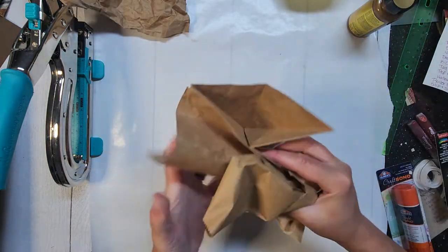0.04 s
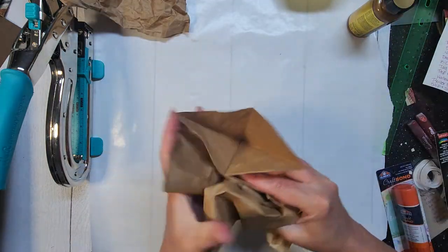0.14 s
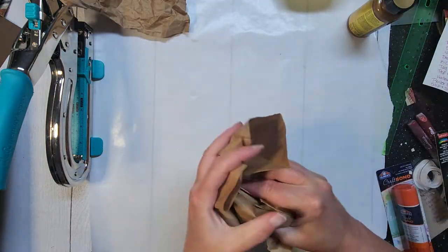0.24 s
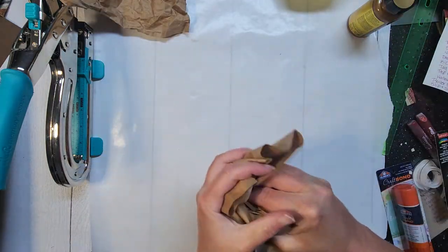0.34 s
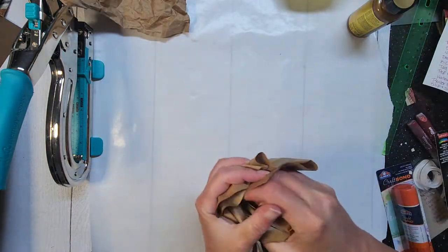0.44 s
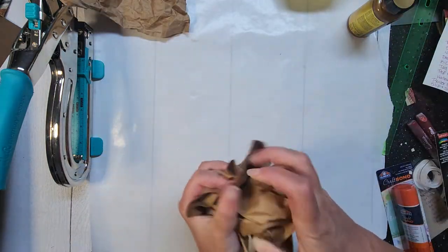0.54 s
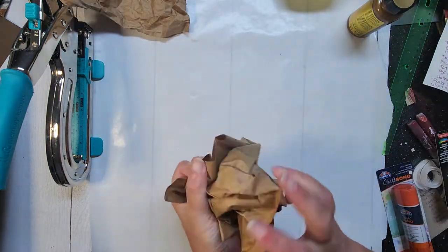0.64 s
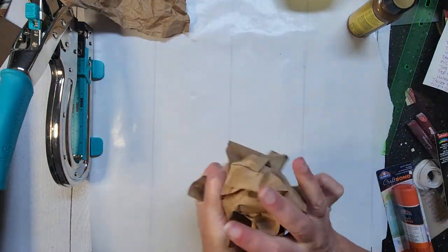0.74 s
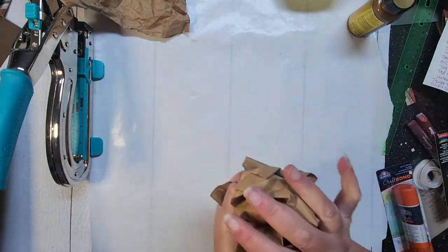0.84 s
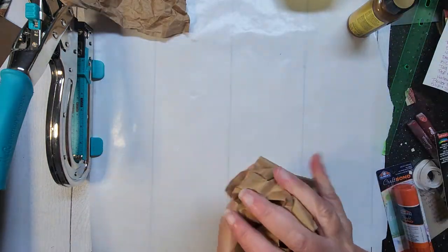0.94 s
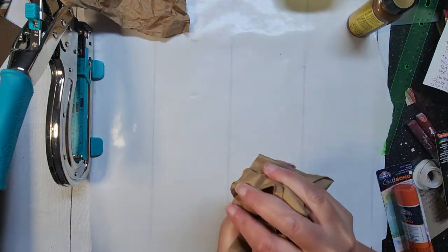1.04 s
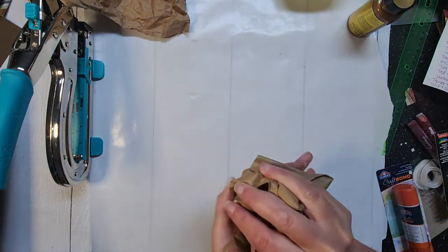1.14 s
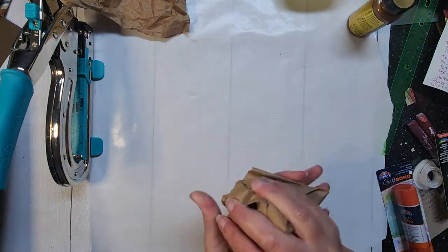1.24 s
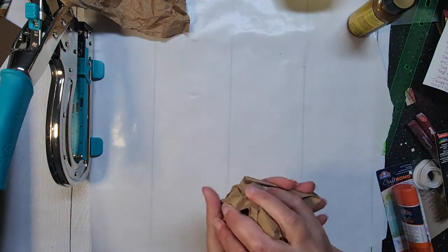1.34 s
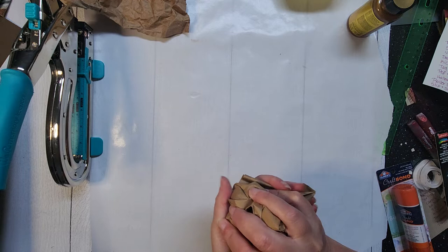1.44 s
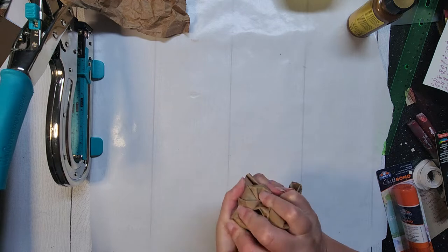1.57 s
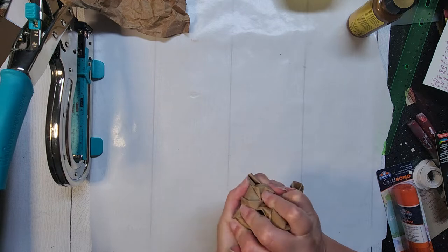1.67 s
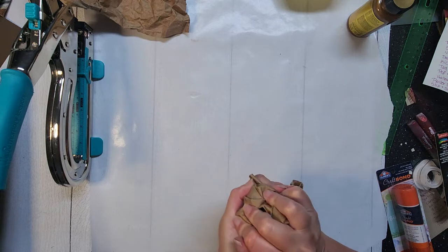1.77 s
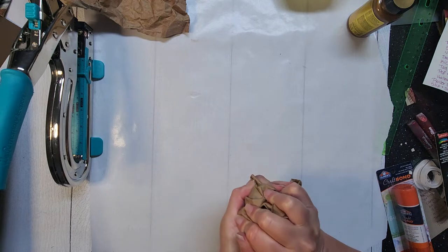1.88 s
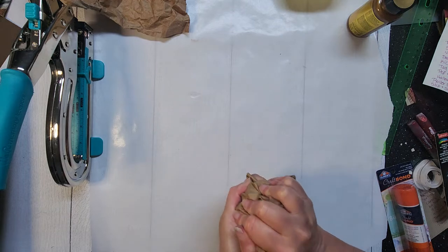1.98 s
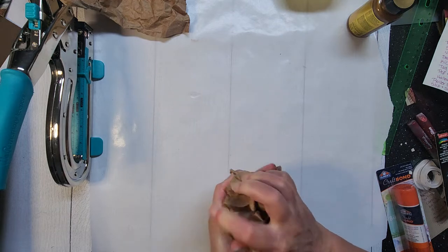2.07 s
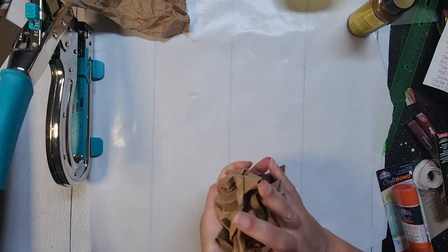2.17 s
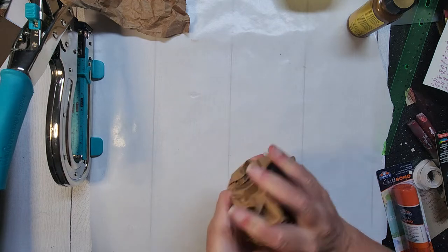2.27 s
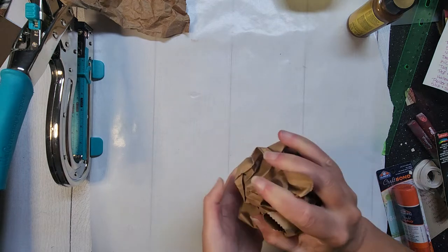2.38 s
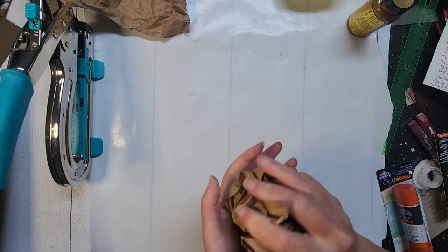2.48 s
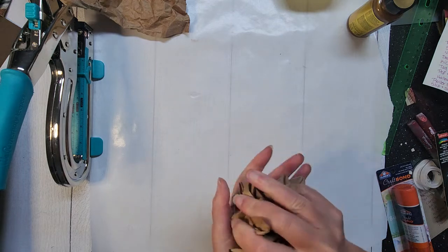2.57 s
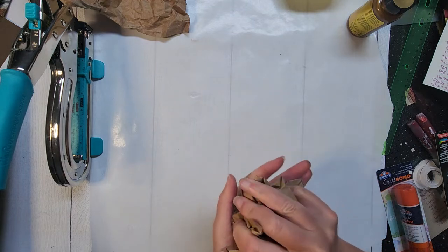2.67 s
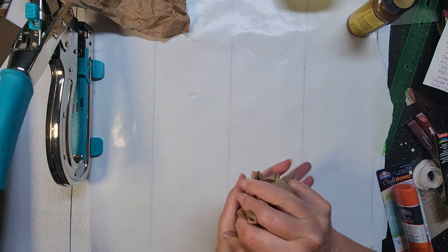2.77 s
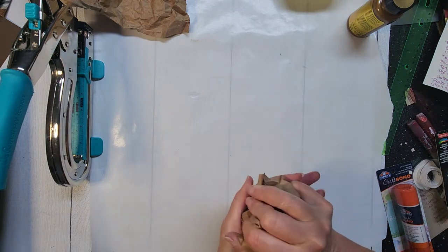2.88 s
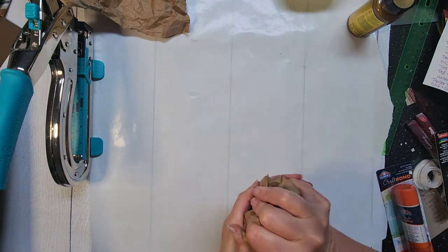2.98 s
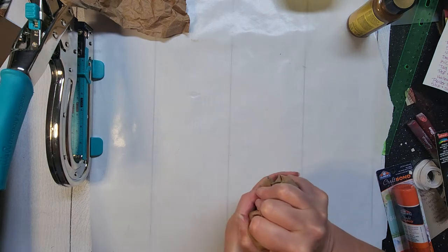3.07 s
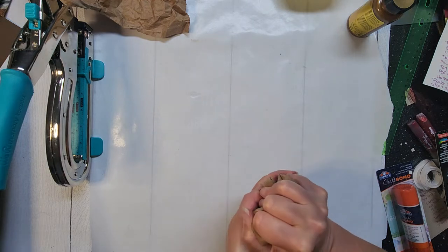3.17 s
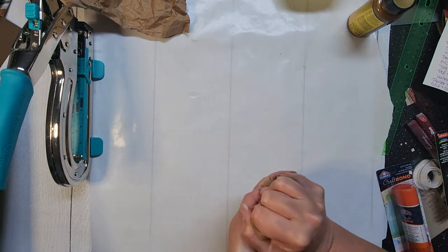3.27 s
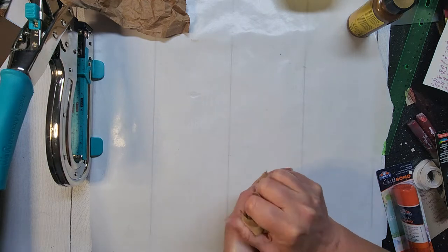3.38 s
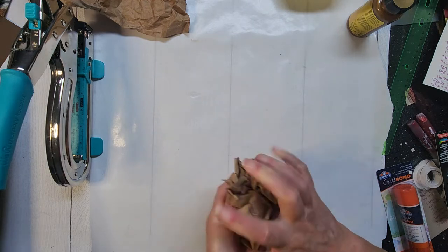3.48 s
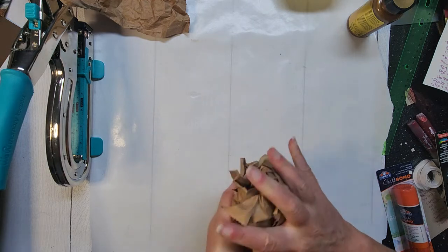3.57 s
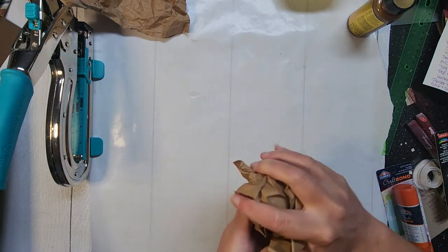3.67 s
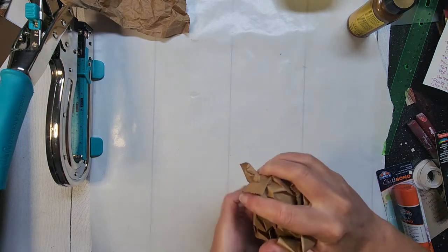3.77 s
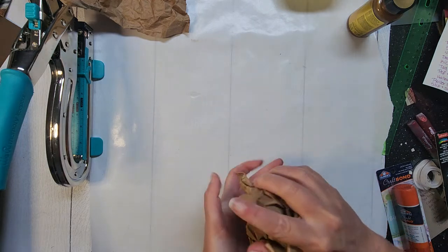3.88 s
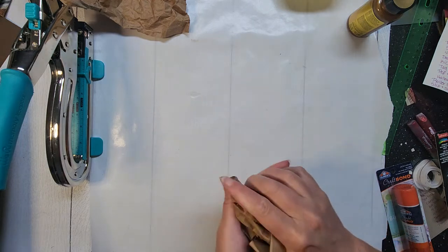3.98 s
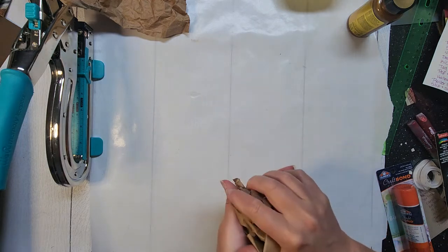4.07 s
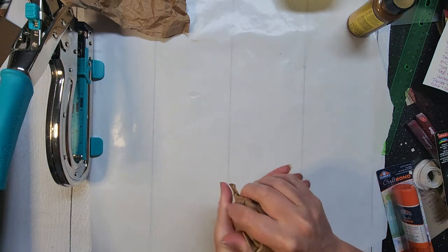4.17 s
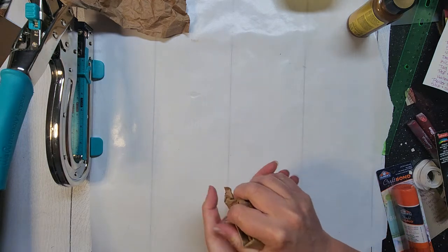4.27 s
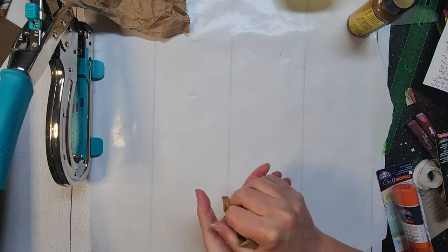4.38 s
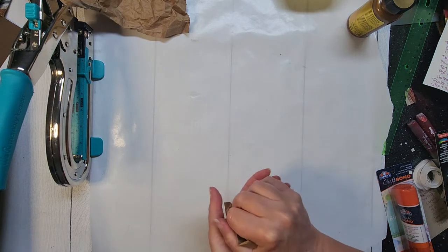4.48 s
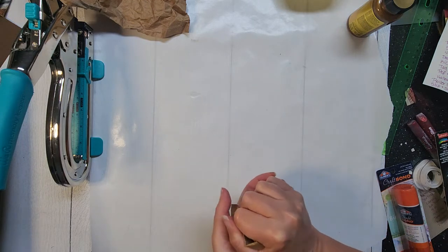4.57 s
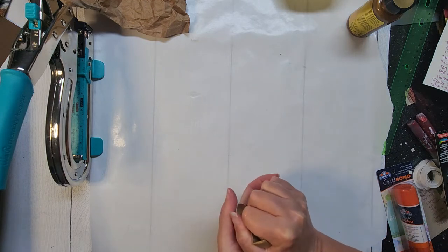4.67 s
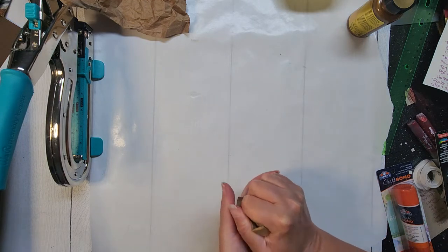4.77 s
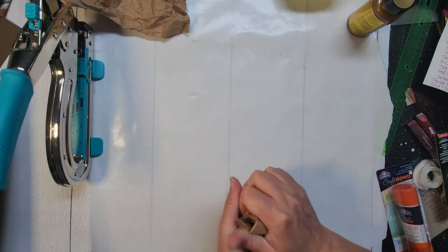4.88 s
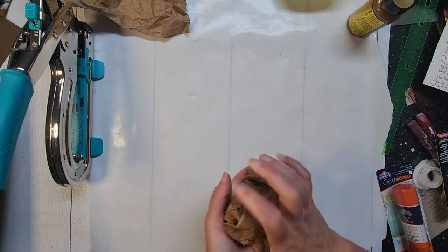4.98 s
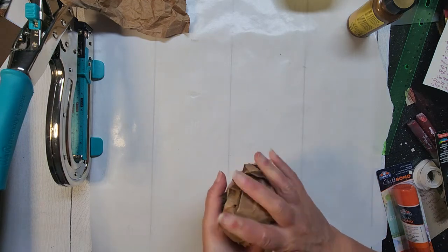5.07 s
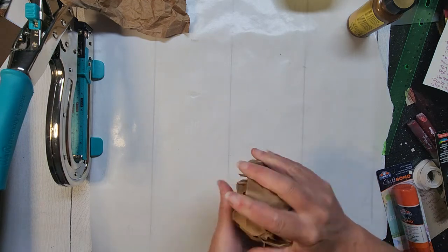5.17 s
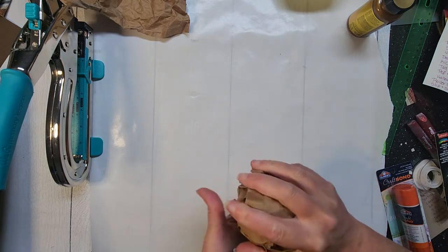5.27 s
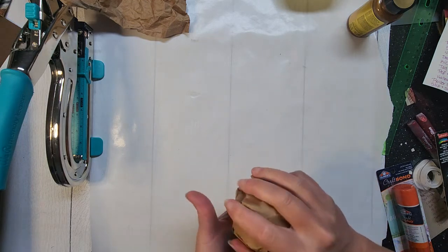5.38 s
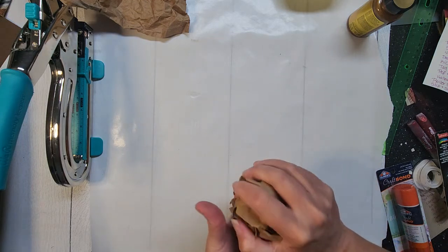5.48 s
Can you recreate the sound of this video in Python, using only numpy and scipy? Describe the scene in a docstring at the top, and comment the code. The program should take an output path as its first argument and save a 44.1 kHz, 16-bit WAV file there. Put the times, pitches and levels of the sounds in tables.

```python
"""A brown paper bag is crushed into a ball by two hands just above a table, close to the microphone, in a small room.
Each crease is a kick and a shiver of noise: a bright crack and the ring of a stiff facet, with small crinkles around.
Paper slides on paper and skin as a hiss of dense clicks; the open bag flaps and booms in low noise bands at first.
The wad thumps as it folds in: a noise knock over a soft low sine. Three times the squeeze rests for a new grip.
Hollows round the wad, echoes of table and walls and a quiet room tone place it before two microphone ports."""
import sys
import numpy as np
from scipy import signal
from scipy.fft import rfft, irfft, next_fast_len
from scipy.io import wavfile
from scipy.ndimage import uniform_filter1d

SR = 44100
rng = np.random.default_rng(int(sys.argv[2]) if len(sys.argv) > 2 else 0)


def output_pcm(signal):
    """Save a mono or channel-first signal as 16-bit PCM at the path in sys.argv[1].

    Samples are clipped to [-1, 1] before scaling.
    """
    pcm = np.clip(np.atleast_2d(signal).T, -1, 1) * 32767
    wavfile.write(sys.argv[1], SR, np.round(pcm).astype(np.int16))


N = 243873


def from_db(db):
    """Amplitude factor of a level in dB."""
    return 10 ** (np.asarray(db) / 20)


def rms_one(x):
    """Scale to an rms of 1."""
    return x / np.sqrt(np.mean(x ** 2) + 1e-20)


def in_time(rows):
    """Each column of a curve at every sample; the first column is t/s."""
    s, *columns = np.transpose(rows)
    return [np.interp(np.arange(N) / SR, s, c) for c in columns]


def filtered(x, hz, kind, order=2):
    """Butterworth filter."""
    return signal.lfilter(*signal.butter(order, np.clip(hz, 20, .47 * SR), kind, fs=SR), x)


def coloured(x, spectrum):
    """Causal (minimum-phase) filter that follows a spectrum; rms 1."""
    size = next_fast_len(N // 2 + 4096) * 2
    hz, db = np.transpose(spectrum)
    bins_hz = np.arange(size // 2 + 1) * SR / size
    gain_db = np.interp(np.log(bins_hz + 1), np.log(hz), db)
    # keeping only the first half of the cepstrum makes the filter causal
    cepstrum = irfft(np.log(from_db(gain_db)))[:size // 2]
    response = np.exp(2 * rfft(cepstrum, size))
    return rms_one(irfft(rfft(x, size) * response)[:, :N])


def add(out, s, sound):
    """Mix a short stereo sound in at time s."""
    at = int(np.clip(round(s * SR), 0, N - 1))
    out[:, at:at + sound.shape[1]] += sound[:, :N - at]


def spread(clicks, lag_s):
    """Give every click its own spot, so it reaches the two microphone ports at slightly different times."""
    at = np.arange(len(clicks))
    lag = np.round(rng.normal(0, lag_s * SR, len(at))).astype(int)
    late = np.clip(at + lag, 0, at[-1])
    return np.array([clicks, np.bincount(late, clicks, len(at))])


# quiet small room: (f/Hz, relative level/dB per Hz)
QUIET_ROOM = [(20, -29.5), (45, -7.5), (78, -3.5), (100, -14), (135, -1), (180, -17.5), (300, -12.5),
              (800, -24.5), (1700, -35.5), (8000, -47), (16000, -54.5)]


def room_tone(level_db=-68.5):
    """The steady tone of the room: noise in a fixed colour, widely spread between the ports."""
    return from_db(level_db) * coloured(spread(rng.standard_normal(N), 0.0012), QUIET_ROOM)


# the hands close on the wad, hold it, ease off and let go; the last hold lasts to the end:
# (closed t/s, easing from t/s, letting go t/s, rustle level/dB)
HAND_GRIPS = [(0.0, 1.623, 1.895, -43), (2.062, 2.76, 3.24, -43), (3.43, 4.424, 4.659, -42),
              (5.09, 6.3, 5.56, -41.5)]
CLOSE_DB_PER_S, EASE_DB, LET_GO_DB_PER_S = 382, 16.5, 328
# colour of a held grip against its rustle; it brightens as the pressure eases
GRIP_BODY_DB, GRIP_EDGE_DB, EASED_BRIGHTER_DB = -8.5, 0.5, 5
# folds sliding over each other under a push of the fingers: (peak t/s, rise t/s, fall t/s,
# rustle level/dB, hollow body relative level/dB, bright edge relative level/dB)
FOLD_SLIDES = [(0.0, .02, 0.021, -20.5, -9, -0.5), (0.05, 0.047, 0.065, -24, -8.5, 0),
               (0.188, 0.044, 0.053, -20.5, -10, 0), (0.375, 0.17, 0.074, -36.5, 2, -2),
               (0.477, .055, 0.021, -25.5, -9.5, 0), (0.57, 0.051, 0.12, -23.5, -5, 2),
               (0.738, 0.045, 0.015, -27.5, -5, 1.5), (0.827, 0.072, 0.042, -26.5, -6, -4),
               (0.987, 0.076, 0.045, -30, -5.5, -2), (1.051, 0.025, 0.052, -26, -5, -2),
               (1.155, 0.047, 0.029, -28, -8.5, -1), (1.285, 0.058, 0.032, -31.5, -6.5, 1),
               (1.517, 0.14, 0.098, -33.5, -8, -2), (1.78, 0.073, 0.047, -53, -0.5, 9.5),
               (2.133, 0.07, .08, -31, -9, 1.5), (2.325, 0.094, 0.23, -35.5, -5.5, -0.5),
               (2.466, 0.045, 0.16, -32.5, -4, 3), (2.57, 0.028, 0.12, -34, -1, -14),
               (2.815, 0.14, 0.043, -34, -10.5, -6), (2.982, 0.13, 0.037, -35.5, -10, -7),
               (3.085, 0.083, 0.052, -37, -9.5, -15), (3.166, .008, 0.031, -53, 1.5, 3),
               (3.36, 0.14, .06, -64, -19, -3), (3.488, 0.089, .024, -32.5, -10, 3.5),
               (3.58, 0.041, 0.026, -28, -6.5, 3), (3.67, 0.066, .09, -38.5, -6, 3),
               (3.802, 0.046, 0.017, -27.5, -8, 2), (3.881, 0.087, 0.022, -33, -9.5, -1),
               (3.967, 0.022, 0.067, -29, -11, -5.5), (4.178, 0.05, 0.078, -27, -17, 1),
               (4.416, 0.033, 0.028, -37.5, 6.5, -17), (4.86, 0.061, .05, -54.5, -14, 5.5),
               (4.941, 0.06, 0.073, -35.5, -12.5, 3.5), (5.001, 0.049, 0.014, -35.5, -6.5, 2.5),
               (5.086, 0.028, 0.023, -32, -14, 1), (5.32, 0.014, 0.048, -45, -16, 1)]
# a slide swells and dies by this much within its rise and its fall; beyond them it drops more steeply
SLIDE_SWING_DB, SLIDE_CURVE = 14.5, 1.54


def squeeze():
    """Level of the rustle, and of its hollow body and bright edge against it (dB): steady grips with slides on top."""
    t = np.arange(0, N, 32) / SR
    parts = []
    for closed_s, ease_s, let_go_s, db in HAND_GRIPS:
        eased = np.interp(t, [ease_s, let_go_s], [0, 1])
        closing_db = CLOSE_DB_PER_S * np.maximum(closed_s - t, 0)
        letting_go_db = LET_GO_DB_PER_S * np.maximum(t - let_go_s, 0)
        level_db = db - closing_db - EASE_DB * eased - letting_go_db
        brighter_db = EASED_BRIGHTER_DB * eased
        parts.append([level_db, level_db + GRIP_BODY_DB - brighter_db, level_db + GRIP_EDGE_DB + brighter_db])
    for s, rise_s, fall_s, db, body_db, edge_db in FOLD_SLIDES:
        from_peak = np.maximum((s - t) / rise_s, (t - s) / fall_s)
        level_db = db - SLIDE_SWING_DB * from_peak ** SLIDE_CURVE
        parts.append([level_db, level_db + body_db, level_db + edge_db])
    # grips and slides add in power
    level, body, edge = 10 * np.log10(np.sum(from_db(parts) ** 2, axis=0) + 1e-20)
    return in_time(np.transpose([t, level, body - level, edge - level]))


# paper sliding on paper, close to the microphone: (f/Hz, relative level/dB per Hz)
PAPER_HISS = [(40, -30.5), (140, -27), (250, -15), (460, -6), (630, -9.5), (850, -4.5), (1100, -3),
              (1600, 0), (2600, 0.5), (5000, -1.5), (7500, -10), (10500, -13.5), (15500, -18)]


def rustle(rustle_db, body_db, edge_db, catches_per_s=6000, scatter_db=4, judder_db=3.0,
           body_gain_db=-2.5, mid_gain_db=-1, edge_gain_db=-1):
    """Fibres catch and slip thousands of times a second, in uneven spurts."""
    judder = rms_one(uniform_filter1d(rng.standard_normal(N), size=130))
    catches = (rng.random(N) < catches_per_s / SR) * rng.choice([-1, 1], N)
    sizes = from_db(scatter_db * np.clip(rng.standard_normal(N), -2, 2) + judder_db * judder)
    hiss = coloured(spread(catches * sizes, 8.5e-5), PAPER_HISS)
    # closed hands bring out the hollow body, sliding over open paper the bright edge
    body = rms_one(filtered(hiss, 1052, "low", order=3))
    middle = rms_one(filtered(hiss, [1200, 5000], "band", order=3))
    edge = rms_one(filtered(hiss, 6470, "high", order=3))
    return (from_db(rustle_db + body_db + body_gain_db) * body
            + from_db(rustle_db + mid_gain_db) * middle
            + from_db(rustle_db + edge_db + edge_gain_db) * edge)


def open_bag(rustle_db, flap_db=-18, boom_db=-19, boom_hz=330, closed_s=1.0, flaps_per_s=120):
    """While the bag is still open, its wide walls flap, boom and push out puffs of air."""
    still_open = np.clip(1 - (np.arange(N) / SR / closed_s) ** 2, 0, 1)
    flaps = spread((rng.random(N) < flaps_per_s / SR) * rng.standard_normal(N), 4e-4)
    air = from_db(flap_db) * rms_one(filtered(flaps, [36, 190], "band"))
    boom = from_db(boom_db) * rms_one(filtered(flaps, [boom_hz / 1.1, boom_hz], "band"))
    return from_db(rustle_db) * still_open * (air + boom)


LEAD_S = .003  # the noise of a snap swells for this long before its kick


def snap(hz, ring_db, crack_db, pan_db, shiver_db=-16, tear_db=-9, rise_s=0.00056, shiver_s=0.0023,
         width=1.313, upper=1.87, upper_db=-6, crack_hz=2900, top_hz=8000, span_s=0.0022, size=760):
    """A crease flips: one kick in a brief shiver of the sheet gives a bright crack and a facet's damped ring."""
    t = np.arange(size) / SR - LEAD_S
    shiver = spread(rng.standard_normal(size), 7e-5) * np.exp(np.minimum(t / rise_s, -t / shiver_s))
    kick = np.zeros((2, size))
    # the second port hears the kick up to three samples later
    kick_at = round(LEAD_S * SR) + np.array([0, rng.integers(0, 4)])
    kick[[0, 1], kick_at] = rng.choice([-1, 1])
    # a facet has two broad modes and radiates little bass
    flip = kick + from_db(shiver_db) * shiver
    band = hz * max(width, 1.05) ** np.array([-1, 1])
    lower_mode = filtered(flip, band, "band", order=1)
    upper_mode = filtered(flip, min(upper, 14000 / hz) * band, "band", order=1)
    modes = lower_mode + from_db(upper_db) * upper_mode
    ring = filtered(filtered(modes, 2.24 * hz, "low"), 584, "high")
    # fibres giving way along the crease make the crack
    tear = kick + from_db(tear_db) * shiver
    crack = filtered(filtered(tear, crack_hz, "high"), top_hz, "low", order=1)
    sound = from_db(ring_db) * rms_one(ring) + from_db(crack_db) * rms_one(crack)
    # levels are rms with all the energy counted within span_s
    return sound * np.sqrt(span_s * SR / size) * from_db([[pan_db / 2], [-pan_db / 2]])


# single creases close to the microphone, from loud snaps to faint ticks in the pauses:
# (t/s, facet pitch f/Hz, facet ring level/dB, sharp crack level/dB, left-right level/dB)
SINGLE_CREASES = [(0.002, 2400, -30, -19.5, -1), (0.0765, 2300, -20, -31, 1), (0.098, 1510, -23, -39, -3),
                  (0.1417, 1800, -13.5, -17, 0.5), (0.1598, 5400, -12.5, -20, -2.5),
                  (0.1916, 710, -24, -23, 7), (0.195, 1820, -14.5, -36, -3), (0.2298, 1060, -17.5, -29, -3),
                  (0.2426, 1290, -12, -18.5, -0.5), (0.2838, 820, -17.5, -23, -0.5),
                  (0.295, 4630, -21, -16, 2), (0.3021, 2440, -17, -39, 1), (0.322, 2890, -20, -44, 2),
                  (0.335, 474, -49.5, -12.5, -3.5), (0.3512, 3240, -19, -15, -3),
                  (0.3756, 4700, -14.5, -41, 1), (0.3813, 1190, -14.5, -15.5, -2),
                  (0.4111, 1050, -20.5, -20, 1), (0.419, 5100, -19, -30, -2), (0.4424, 1700, -21.5, -26, 3),
                  (0.4555, 2010, -43, -17.5, -6), (0.5081, 3900, -17.5, -17, -3),
                  (0.52, 1450, -17, -10, -0.5), (0.5489, 1380, -38, -10, 2), (0.599, 690, -25, -13.5, 4.5),
                  (0.6618, 4300, -23.5, -15.5, -4.5), (0.669, 4130, -18, -32, 10),
                  (0.697, 1510, -20, -34, 1), (0.7096, 900, -20, -12.5, 1.5), (0.7292, 800, -20.5, -16, 1),
                  (0.746, 1510, -25, -34, 8), (0.7666, 1150, -16.5, -10.5, -0.5),
                  (0.7879, 2860, -19, -39, 8), (0.805, 1930, -16.5, -17, -1), (0.8181, 6600, -38, -19, -8),
                  (0.827, 4280, -17, -10.5, 0.5), (0.924, 990, -14, -21.5, -2),
                  (0.944, 1440, -25.5, -21.5, 0), (0.9845, 2530, -22, -37, -2),
                  (1.0439, 1170, -20, -31, -3), (1.0542, 2550, -17.5, -41, 0), (1.069, 4820, -24, -39, -6),
                  (1.0888, 816, -21, -24, -3), (1.1196, 3150, -22.5, -18.5, -4),
                  (1.136, 1890, -18.5, -28, 0), (1.1504, 1600, -24, -19, -1), (1.1634, 1890, -35, -20, -1),
                  (1.2305, 1630, -22.5, -33, -3), (1.2837, 2500, -11, -16, -2.5),
                  (1.3252, 980, -28.5, -23.5, 0), (1.3412, 730, -32, -24.5, -2),
                  (1.3726, 2100, -28.5, -30, 0), (1.423, 1830, -24, -17.5, 2), (1.447, 1310, -27, -17.5, 3),
                  (1.4676, 450, -30, -17, -3.5), (1.4876, 910, -23, -43, 0), (1.5149, 1110, -16, -16.5, -1),
                  (1.5146, 3730, -18.5, -30, 1), (1.59, 1900, -30, -29.5, 2), (1.6009, 2500, -27, -52, -2),
                  (1.6977, 3540, -43, -30.5, 3), (1.735, 7000, -33, -31, 3), (1.7594, 5140, -24, -41, -4),
                  (1.9013, 4240, -33.5, -58, -1.5), (2.0681, 1700, -21.5, -17.5, 1),
                  (2.271, 1240, -29.5, -30, 0), (2.3218, 2350, -18.5, -22.5, 3),
                  (2.3246, 1580, -27, -20, -6), (2.404, 2500, -37, -23.5, 1), (2.5488, 2010, -24, -44, -2),
                  (2.5725, 3300, -17.5, -36, -6), (2.6966, 3360, -22, -17.5, 0),
                  (2.7778, 2760, -23.5, -51, 2), (2.8061, 2070, -20, -55, 0),
                  (2.8122, 2980, -19.5, -50, -2), (2.8675, 3200, -29, -42, -2),
                  (2.954, 1510, -36, -28.5, -2), (2.9856, 2360, -16.5, -35, -1),
                  (3.047, 5900, -20.5, -42, -3), (3.0779, 1170, -23, -22.5, -1), (3.09, 1900, -40, -28, 2),
                  (3.1086, 1940, -33, -43, -3), (3.1582, 2580, -15, -20, -0.5),
                  (3.238, 6600, -40.5, -62, -5), (3.2504, 6030, -43, -55, -4), (3.2593, 1310, -54, -47, -1),
                  (3.282, 6750, -41, -64, -3), (3.3238, 2600, -52, -51, -3), (3.3911, 1950, -33, -54, -2),
                  (3.498, 5860, -16, -34, -3), (3.5457, 2310, -21, -24.5, 2),
                  (3.5755, 3170, -19.5, -30, -4), (3.808, 1980, -26, -23, -2),
                  (3.891, 480, -35, -16.5, -2.5), (3.992, 1240, -23, -17.5, -1),
                  (4.0588, 1800, -22, -18.5, -4), (4.148, 1440, -29, -21.5, 4),
                  (4.1985, 870, -32, -19.5, 8), (4.3088, 2760, -26, -15.5, 1.5),
                  (4.3301, 2440, -25, -21.5, 0), (4.3661, 1480, -19, -30, 2), (4.3813, 2840, -23, -25.5, 5),
                  (4.4116, 780, -19.5, -46, -2), (4.425, 2800, -15.5, -29, 2.5),
                  (4.475, 4230, -27, -38, -1), (4.5517, 5050, -32, -39, -3), (4.5904, 5230, -27.5, -58, -3),
                  (4.6481, 7130, -36.5, -60, 3), (4.797, 2460, -59.5, -44, 0.5),
                  (4.816, 6000, -52, -51.5, 0), (5.0892, 2260, -27, -22.5, 0), (5.1925, 1710, -30, -35, 2),
                  (5.2334, 1530, -34.5, -43, -2), (5.3104, 1340, -28.5, -19.5, -4),
                  (5.3405, 1260, -30, -25.5, -1), (5.359, 5700, -23, -42, -3), (5.476, 3080, -25.5, -48, 3),
                  (5.515, 4730, -21.5, -44, -1)]


def creases():
    """Single creases flip one by one, loud or faint, each on a facet of its own pitch."""
    out = np.zeros((2, N))
    for s, *facet in SINGLE_CREASES:
        add(out, s - LEAD_S, snap(*facet))
    return out


def crinkles(rustle_db, edge_db, count=700, ring_db=-3, crack_db=-6.0, scatter_db=5.5,
             facet_hz=1700, slide_damping=2.9, firmest_db=-29):
    """Small creases give way at random, growing with the squeeze up to a limit, weaker while paper only slides."""
    out = np.zeros((2, N))
    squeeze_db = np.minimum(rustle_db, firmest_db) - slide_damping * np.clip(edge_db, 0, 6)
    times = rng.integers(0, N, count)
    characters = np.clip(rng.standard_normal((count, 4)), -2, 2)
    for at, (strength, pitch, edge, side) in zip(times, characters):
        db = squeeze_db[at] + scatter_db * strength
        hz = facet_hz * np.exp(.5 * pitch)
        add(out, at / SR, snap(hz, db + ring_db, db + crack_db + 1.2 * edge, 2.1 * side))
    return out


# the wad folding in against the palms, levels before the gains of thumps():
# (t/s, knock level/dB, soft push level/dB)
WAD_FOLDS = [(0.049, -24, -37), (0.159, -31, -27.5), (0.173, -27, -40.5), (0.191, -12, -40),
             (0.336, -42, -41), (0.35, -22.5, -48), (0.445, -25, -63), (0.598, -22, -41.5),
             (0.828, -29, -43.5), (1.468, -44, -52), (1.791, -36.5, -69), (2.324, -23.5, -51),
             (2.601, -28, -53), (3.544, -22, -56), (3.88, -30, -46.5), (3.943, -31.5, -41.5),
             (4.06, -31, -56), (4.199, -29, -46), (4.308, -28.5, -43), (5.084, -30, -55.5),
             (5.262, -29, -79)]
# the knock rises in pitch as the loose bag becomes a tight ball
LOOSE_KNOCK_HZ, TIGHT_KNOCK_HZ, TIGHTEN_S = 400, 476, 0.59


def thumps(knock_gain_db=-1, push_gain_db=8.0, push_hz=115, decay_s=0.004, push_decay_s=0.0044, size=3000):
    """A pocket of the wad collapses: a short hollow knock over a soft push of the palms."""
    out, t = np.zeros((2, N)), np.arange(size) / SR
    for s, knock_db, push_db in WAD_FOLDS:
        hz = np.interp(s, [0, TIGHTEN_S], [LOOSE_KNOCK_HZ, TIGHT_KNOCK_HZ])
        burst = spread(rng.standard_normal(size), 0.00023) * np.exp(-t / decay_s)
        knock = filtered(burst, [hz / 1.76, hz * 1.67], "band")
        this_push_hz = push_hz * rng.lognormal(0, 0.4)
        push = filtered(np.sin(2 * np.pi * this_push_hz * t) * np.exp(-t / push_decay_s), 48, "high")
        knock = from_db(knock_db + knock_gain_db) * knock / np.abs(knock).max()
        add(out, s, knock + from_db(push_db + push_gain_db) * push)
    return out


# hollow of the cupped hands and the table top: (f/Hz, width f/Hz, boost level/dB)
HAND_HOLLOWS = [(443, 6.7, 2), (870, 79, 3), (1044, 37, 3.5), (1402, 350, 3), (2168, 85, 4.5),
                (3116, 450, 2.5), (7600, 260, 5)]


def hollows(x):
    """Resonances round the wad, each boosting its own band."""
    for hz, width_hz, boost_db in HAND_HOLLOWS:
        resonance = signal.lfilter(*signal.iirpeak(hz, hz / width_hz, fs=SR), x)
        x = x + (from_db(boost_db) - 1) * resonance
    return x


def room(x, wall_hz=7000, wall_db=-17.5, wall_t60_s=0.22, table_db=-15, table_s=0.0038, size=22000):
    """Quick scatter from the table and the things on it, then a soft tail from the walls."""
    t = np.arange(size) / SR
    near = spread(rng.standard_normal(size), 0.00014) * np.exp(-t / table_s) * (t > .0018)
    far = filtered(spread(rng.standard_normal(size), 0.00066), wall_hz, "low", order=1)
    far = far * from_db(-60 * t / wall_t60_s) * (t > .006)
    echoes = (from_db(table_db) * rms_one(near) + from_db(wall_db) * rms_one(far)) / np.sqrt(size)
    return x + signal.fftconvolve(x, echoes, axes=1)[:, :N]


def scene(paper_db=-1.5):
    """Paper in the hands above the table, over the tone of the room."""
    rustle_db, body_db, edge_db = squeeze()
    paper = rustle(rustle_db, body_db, edge_db) + open_bag(rustle_db)
    paper = paper + creases() + crinkles(rustle_db, edge_db) + thumps()
    return room(from_db(paper_db) * hollows(paper)) + room_tone()


def record(dry, left_db=1.14, right_dull_hz=11500, cutoff_hz=15900):
    """The left microphone port is a little louder, the right one duller; the top is cut steeply."""
    left = from_db(left_db) * dry[0]
    right = filtered(dry[1], right_dull_hz, "low", order=1)
    top_cut = signal.ellip(10, .1, 80, cutoff_hz, fs=SR, output="sos")
    return signal.sosfilt(top_cut, np.array([left, right]))


dry = scene()
out = record(dry)
output_pcm(out)
```